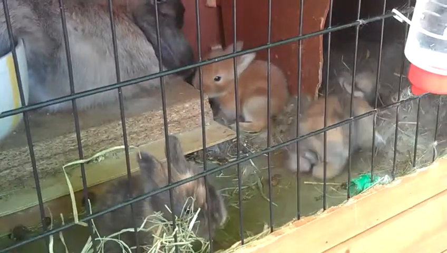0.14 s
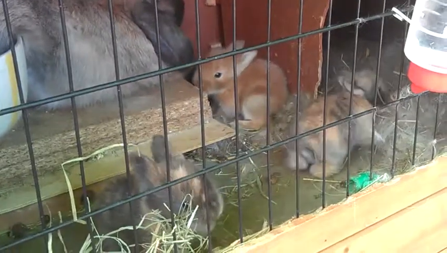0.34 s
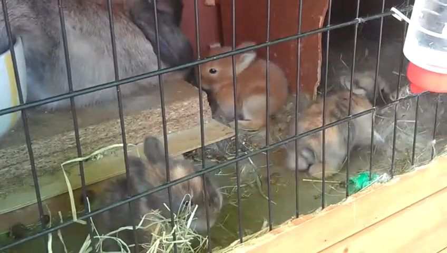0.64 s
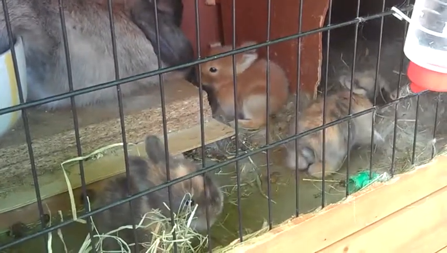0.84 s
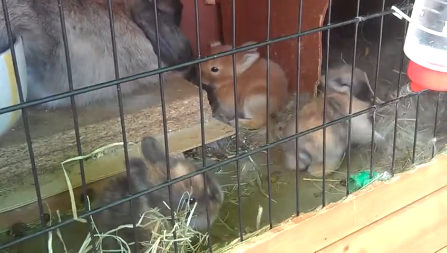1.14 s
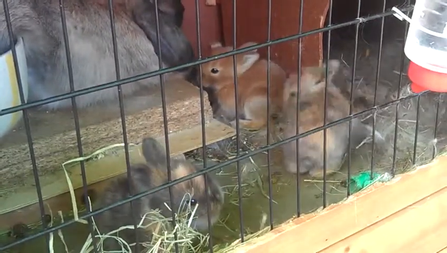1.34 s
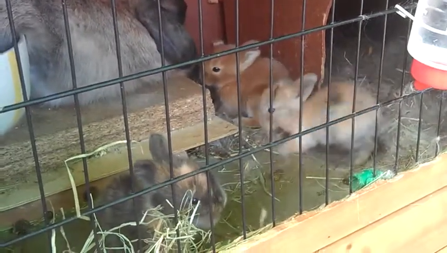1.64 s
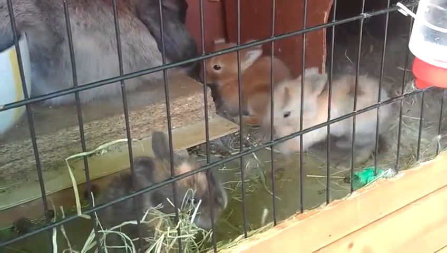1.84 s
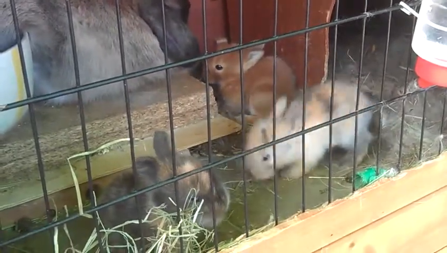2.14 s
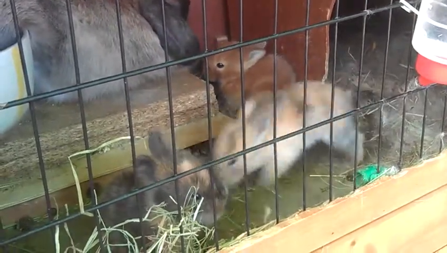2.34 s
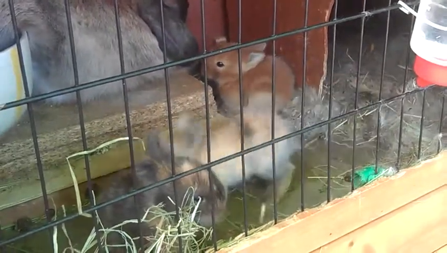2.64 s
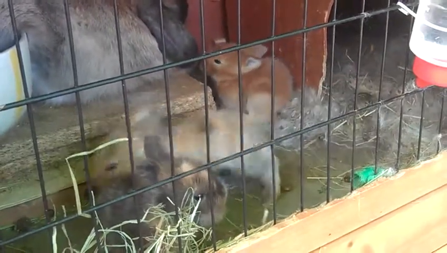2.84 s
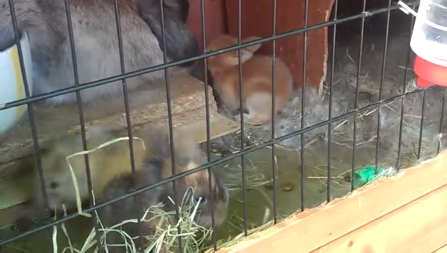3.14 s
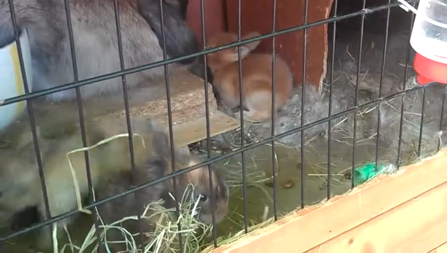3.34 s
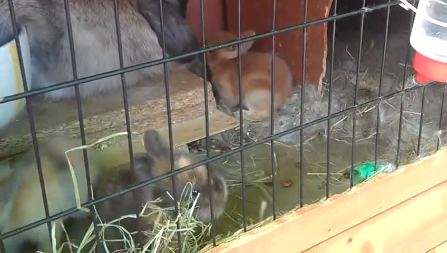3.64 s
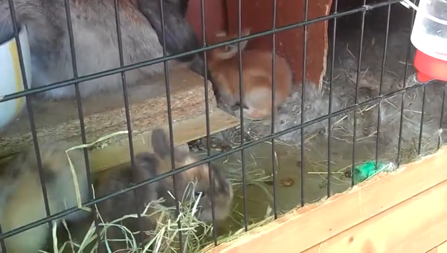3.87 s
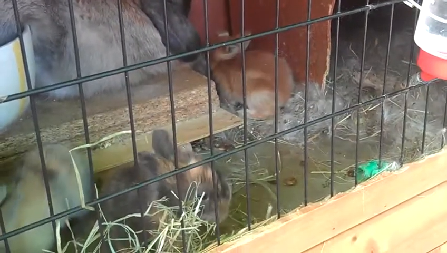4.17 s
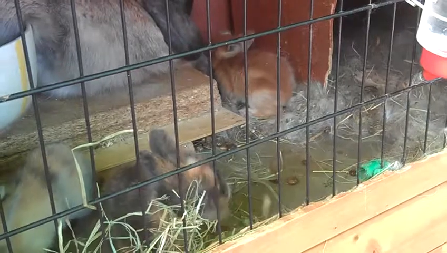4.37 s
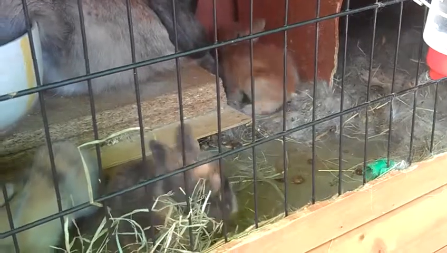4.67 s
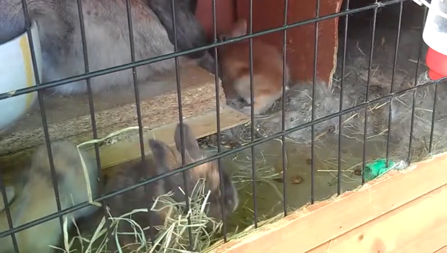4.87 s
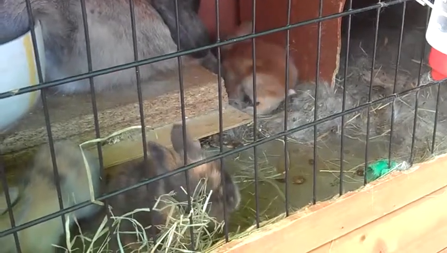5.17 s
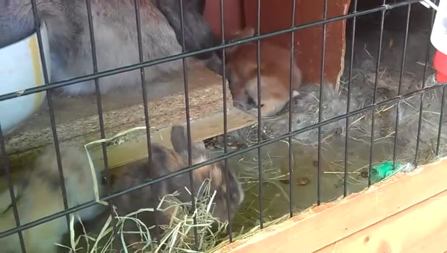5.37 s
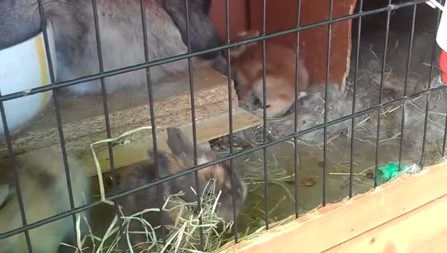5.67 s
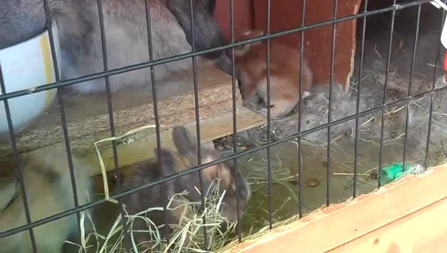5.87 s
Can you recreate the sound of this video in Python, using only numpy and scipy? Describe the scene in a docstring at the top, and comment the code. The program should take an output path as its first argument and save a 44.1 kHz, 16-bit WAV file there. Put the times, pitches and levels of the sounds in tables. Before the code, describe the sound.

A quiet outdoor hutch with steady airy hiss and a far flock of sparrows chirping in bouts. Two tiny low buzzes and a dull bump on the grip come first, then busy hay rustling and sharp stalk snaps, a paw landing on wood, and sparser rustles. Near the end the handled camera body cracks loudly three times, very close, in wide stereo.

```python
"""Young rabbits hop and rummage in dry hay inside a wooden hutch, close to a handheld camera.
Hay, stalks and grit are shaped noise bursts; paws, claws, low buzzes and a bump on the grip are short tones.
The camera shell cracks three times under the fingers: gritty slips set its ringing notes going.
Sparrows, made of falling whistles, chatter far off as echoes over a soft outdoor wash of steady noise.
The recorder widens the stereo picture with a late copy of the left-right difference."""
import sys
import numpy as np
from scipy import signal
from scipy.fft import rfft, irfft, next_fast_len
from scipy.io import wavfile
from scipy.ndimage import uniform_filter1d

SR = 44100
rng = np.random.default_rng(int(sys.argv[2]) if len(sys.argv) > 2 else 0)


def dump(signal):
    """Clip the signal to [-1, 1] and save it as 16-bit WAV at the path in sys.argv[1]."""
    limited = np.clip(np.atleast_2d(signal).T, -1, 1)
    pcm = np.round(limited * 32767).astype(np.int16)
    wavfile.write(sys.argv[1], SR, pcm)


N = 264908  # length of the scene in samples


def amp(db):
    """Turns a level in dB into a gain."""
    return 10 ** (np.asarray(db) / 20)


def evened(x):
    """Scales a sound to an rms of one."""
    return x / np.sqrt(np.mean(x ** 2) + 1e-20)


def read(points, hz, axis=1):
    """Reads one column of a table between its rows, along a log frequency scale."""
    rows = np.transpose(points)
    return np.interp(np.log(hz + 1), np.log(rows[0] + 1), rows[axis])


def shape(x, gain):
    """Filters a sound by a gain given as a function of frequency."""
    size = next_fast_len(N)
    spectrum = rfft(x, size) * gain(np.fft.rfftfreq(size, 1 / SR))
    return irfft(spectrum, size)[..., :N]


def add(mix, s, sound):
    """Mixes a sound in at a time in seconds, cutting off what runs past the end."""
    part = mix[..., round(s * SR):][..., :sound.shape[-1]]
    part += sound[..., :part.shape[-1]]


def high_pass(x, order, hz):
    """Takes away the bass below an edge."""
    return signal.sosfilt(signal.butter(order, hz, "high", fs=SR, output="sos"), x)


def ports(near, other):
    """Makes left and right as sum plus and minus difference; the difference is only partly like the sum."""
    # The two microphone ports. Each row: frequency in Hz, level of the difference against the sum in dB,
    # likeness of sum and difference from -1 to 1.
    port_points = [(60, 1.5, 0.83), (235, -13.5, 0.35), (655, 3, 0.14), (1570, -5.5, 0.3),
                   (3260, -4.5, -0.63), (6700, -3.5, 0.19), (11800, -3, .95), (14000, -1.5, 0.98)]
    same = lambda hz: np.clip(read(port_points, hz, axis=2), -1, 1)
    side = shape(near, lambda hz: amp(read(port_points, hz)) * same(hz))
    side += shape(other, lambda hz: amp(read(port_points, hz)) * np.sqrt(1 - same(hz) ** 2))
    return np.array([near + side, near - side])


def panned(x, pan_db):
    """Makes two channels, left louder than right by pan_db, whose mean keeps the level."""
    left = amp(pan_db)
    return np.outer([left, 1], x) * 2 / (1 + left)


def air():
    """Steady outdoor wash and microphone hiss: shaped noise with a slight slow swell."""
    # Colour of the wash. Each row: frequency in Hz, relative level in dB.
    wash_colour = [(24, -62), (40, -27), (81, -26), (177, -1), (205, 2), (632, -9), (807, -5), (934, -7.5),
                   (1560, -8), (2540, -10.5), (3580, -5), (7090, -19.5), (8830, -19), (11000, -12.5),
                   (13700, -17)]
    wash_db, swell_db = -48.5, .5
    slow = uniform_filter1d(rng.standard_normal(N), size=4000)
    swell = evened(uniform_filter1d(slow, size=4000))
    wash = shape(rng.standard_normal((2, N)), lambda hz: amp(read(wash_colour, hz)))
    near, other = amp(wash_db + swell_db * swell) * evened(wash)
    return ports(near, other)


def chirp(start_hz, end_hz, length):
    """A hoarse falling whistle: a sine whose pitch drops, fast at first, and wobbles at random."""
    t = np.arange(0, length, 1 / SR)
    hz = end_hz + (start_hz - end_hz) * (1 - t / length) ** 1.5
    wobble = evened(uniform_filter1d(rng.standard_normal(len(t)), size=60))
    hz = hz + 190 * wobble  # Hz
    tone = np.sqrt(2) * np.sin(2 * np.pi * np.cumsum(hz) / SR)
    return tone * signal.windows.tukey(len(t), .4)


def yard(x, t60):
    """Far sounds arrive only as two unrelated clouds of echoes, which fall 60 dB in t60 seconds."""
    t = np.arange(SR) / SR
    tails = rng.standard_normal((2, SR)) * amp(-60 * t / t60)
    return signal.fftconvolve(x[None], tails / np.linalg.norm(tails[0]), axes=1)[:, :N]


def sparrows():
    """A dense far flock of short chirps, louder in bouts, with a few falling calls on top."""
    # Bouts of chatter. Each row: loudest moment in seconds, level in dB.
    bouts = [(.0, -48), (0.159, -46), (.56, -51), (.75, -53.5), (1.19, -49.5), (1.69, -45.5), (1.8, -52),
             (2.02, -53.5), (2.33, -44), (2.96, -45), (3.2, -52), (3.709, -48.5), (4.06, -41), (4.78, -43),
             (5.399, -53), (5.52, -48.5), (5.628, -52), (6.0, -45.5)]
    # Falling calls. Each row: start in seconds, level in dB, start pitch in Hz, end pitch in Hz,
    # length in seconds; each bird shifts and delays its call a little.
    falling_calls = [(0.71, -59, 5350, 4690, 0.045), (1.083, -49.5, 6000, 3800, 0.11),
                     (1.897, -55.5, 5600, 4460, 0.087), (2.266, -58, 5200, 3900, 0.061),
                     (2.868, -44, 5590, 4005, 0.07), (4.102, -53, 5100, 4780, 0.044),
                     (4.627, -46, 5810, 3800, .12), (5.381, -52, 4600, 3220, .12),
                     (5.575, -58, 5403, 4376, 0.045)]
    swell_db_per_s, hush_db_per_s, murmur_db = 91.5, 69.5, -62  # fast swell, slower hush, steady murmur
    crest_s = 0.044  # how rounded the top of a bout is
    flock_hz, lead_hz, flock_spread = 3546, 299.5, .2  # the first voices of a bout are higher
    answers, answer_s, answer_spread = 3, .05, .2  # a call is a few birds almost together

    s, db = np.transpose(bouts)[:, :, None]
    t = np.arange(0, N / SR + .01, .005)
    slope = np.where(t < s, -swell_db_per_s, -hush_db_per_s)
    power = amp(db + slope * (np.hypot(t - s, crest_s) - crest_s)) ** 2
    total = power.sum(axis=0) + amp(murmur_db) ** 2
    rising_share = (power * (t < s)).sum(axis=0) / total
    centre_hz = flock_hz + lead_hz * rising_share

    flock, calls = np.zeros(N), np.zeros(N)
    for at, pitch, fall in rng.random((900, 3)) * [N / SR, 1, 1]:
        hz = np.interp(at, t, centre_hz) * (1 + flock_spread * (pitch - .5))
        add(flock, at, chirp(hz * (1 + 0.2522 * fall), hz * (1 - 0.1297 * fall), .03))
    for at, db, start_hz, end_hz, length in falling_calls:
        for late, pitch in rng.random((answers, 2)):
            bird = 1 + answer_spread * (pitch - .5)
            call = chirp(bird * start_hz, bird * end_hz, length)
            add(calls, at + answer_s * late ** 2, amp(db) / np.sqrt(answers) * call)

    level = np.interp(np.arange(N) / SR, t, np.sqrt(total))
    far_flock = evened(yard(flock, t60=0.17)) * level
    return ports(*far_flock + yard(calls, t60=0.49))


def hay():
    """Each rustle is a clump of tiny snaps of uneven size over a duller scuff."""
    # Hay rustles. Each row: time in seconds, crisp level in dB, low scuff against crisp in dB,
    # length in seconds (the loudest point is half a length after the start).
    rustles = [(0.061, -48, -19, 0.0126), (0.573, -45, -16, 0.0037), (1.289, -47, -19.5, 0.011),
               (1.369, -43.5, -12, 0.008), (1.444, -40, 3.5, 0.035), (1.508, -50, -4, 0.052),
               (1.604, -50, -4, 0.064), (1.658, -57, 8, 0.043), (2.091, -48, 2, 0.018),
               (2.136, -64, 20, 0.028), (2.299, -50.5, 6, 0.064), (2.372, -63, 16.5, 0.022),
               (2.419, -53.5, 6, 0.012), (2.445, -48, 2.5, 0.025), (2.509, -39.5, -6.5, 0.038),
               (2.534, -35, -16, 0.039), (2.568, -48.5, 5.5, 0.043), (2.622, -51.5, 4, 0.018),
               (2.698, -49, -18, 0.016), (2.793, -57, -10, 0.021), (2.856, -47.5, 1, 0.065),
               (2.915, -51.5, 5, 0.021), (2.943, -46, -1, 0.013), (3.066, -57, 14.5, 0.025),
               (3.175, -52.5, 4, 0.008), (3.265, -48.5, -13.5, 0.0116), (3.378, -45.5, -14, 0.039),
               (3.549, -48, 2.5, 0.033), (3.687, -51.5, 2, 0.055), (4.115, -50, -5, 0.037),
               (4.614, -57, 2, 0.033), (4.778, -51.5, -6, 0.028), (5.72, -54.5, 2.5, 0.035),
               (5.753, -64.5, 15, 0.068), (5.88, -38, -13, 0.026), (5.913, -58, 6, 0.055),
               (5.96, -51.5, 4.5, 0.066)]
    # Colour of snapping stalks. Each row: frequency in Hz, relative level in dB.
    crisp_colour = [(300, -60), (1500, -12.5), (3500, 5), (6000, -3.5), (8000, -4.5), (11000, 5),
                    (14000, -9)]
    # Colour of paws dragging bedding. Each row: frequency in Hz, relative level in dB.
    scuff_colour = [(100, -60), (300, -21), (800, 2), (1500, 4), (2500, 9.5), (3500, 8.5), (4700, -1),
                    (6500, -17), (9000, -42)]
    crisp, scuff = np.zeros(N), np.zeros(N)
    for s, db, scuff_db, length in rustles:
        u = np.arange(0, 4, 1 / (length * SR)) * 2
        swell = amp(db) * (u * np.exp(1 - u)) ** 2.2
        start = s - .003  # a little before the listed time
        add(crisp, start, swell)
        add(scuff, start, swell * amp(scuff_db))

    # every 30 samples get a size of their own, shared by the two channels of each layer
    sizes = amp(3 * np.minimum(rng.exponential(1, (2, N // 30 + 1)), 3))
    sizes = sizes.repeat(30, axis=1).repeat(2, axis=0)[:, :N]
    snaps = rng.standard_normal((4, N)) * sizes
    bright = evened(shape(snaps[:2], lambda hz: amp(read(crisp_colour, hz))))
    dull = evened(shape(snaps[2:], lambda hz: amp(read(scuff_colour, hz))))
    return ports(*crisp * bright + scuff * dull)


def buzzes():
    """Short low buzzes: four pulses of a tone with three overtones, swelling and fading once."""
    # Each row: start in seconds, level in dB, pulses per second in Hz.
    low_buzzes = [(.067, -37.5, 213), (0.625, -37.5, 214.9)]
    out, t = np.zeros((2, N)), np.arange(2000) / SR
    for s, db, hz in low_buzzes:
        pulses = sum(amp(-4 * k) * np.sin(2 * np.pi * k * hz * t) for k in range(1, 5))
        swell = np.sin(np.pi * np.minimum(t * hz / 4, 1)) ** 0.48
        add(out, s, panned(amp(db) * pulses * swell, 13))
    return out


def grip_bump():
    """A finger bumps the grip: a short tone whose pitch drops as the grip settles."""
    # Each row: start in seconds, level in dB, end pitch in Hz, extra pitch at the start in Hz.
    bumps = [(0.9553, -27, 165, 885)]
    out, t = np.zeros((2, N)), np.arange(2000) / SR
    for s, db, hz, glide_hz in bumps:
        turns = np.cumsum(hz + glide_hz * np.exp(-t / 0.00076)) / SR
        fade = np.exp(-(t / 0.00733) ** 2)
        add(out, s, panned(amp(db) * np.sin(2 * np.pi * turns) * fade, 13))
    return out


def burst(tilt_db, t60, rise_s):
    """A pair of unrelated gritty noise bursts: a sudden start, then a fall of 60 dB in t60 seconds."""
    # Colour of the grit before the tilt. Each row: frequency in Hz, relative level in dB.
    grit_colour = [(300, -62), (700, -12), (2000, 6), (3500, 17.5), (6000, 0), (8000, 1.5), (12000, 1),
                   (14000, -22)]
    t, hz = np.arange(1024) / SR, np.fft.rfftfreq(1024, 1 / SR)
    octaves = np.log2(hz / 3000 + 0.0092)  # the small offset keeps the log finite at 0 Hz
    colour = amp(read(grit_colour, hz) + tilt_db * octaves)
    grit = irfft(rfft(rng.standard_normal((2, 1024))) * colour)
    return evened(grit) * amp(-60 * t / t60) * (1 - np.exp(-t / rise_s))


def stalks():
    """A breaking stalk is one short burst of grit."""
    # Single stalks. Each row: start in seconds, level in dB, brightness in dB per octave.
    breaks = [(1.453, -33, -2), (1.4612, -23, -1), (2.1443, -43.5, -13), (2.2949, -21.5, -3.5),
              (2.3186, -33.5, -6), (2.3354, -33, -5), (2.4205, -40, -8), (2.451, -44, 3), (2.577, -28, 0),
              (2.941, -33, -2), (3.069, -38, -10), (3.175, -38, -2), (3.717, -33, -3), (3.872, -23.5, 3),
              (4.6028, -27.5, -1.5), (5.7444, -36, -11), (5.989, -32, 0)]
    out = np.zeros((2, N))
    for s, db, tilt_db in breaks:
        add(out, s, amp(db) * burst(tilt_db, t60=0.014, rise_s=0.00086))
    return ports(*out)


def claws():
    """A claw scraping a board gives a faint, unsteady, falling note of the board."""
    # Each row: start in seconds, level in dB, start pitch in Hz, end pitch in Hz, length in seconds.
    scrapes = [(2.143, -49.5, 965, 847, 0.03), (4.597, -53.5, 1697, 1486, 0.088),
               (5.741, -56, 1400, 1303, 0.043), (5.947, -50, 1660, 1530, 0.066)]
    out = np.zeros((2, N))
    for s, db, *note in scrapes:
        add(out, s, amp(db) * np.array([chirp(*note), chirp(*note)]))
    return ports(*out)


def paws():
    """A paw landing on the floor boards: a low board tone and a little noise that swell and die quickly."""
    # Each row: start in seconds, level in dB, pitch of the board in Hz.
    landings = [(2.7, -59, 240), (3.068, -35.5, 320), (3.086, -33.5, 272), (3.106, -42, 273),
                (3.128, -46, 260)]
    out, t = np.zeros((2, N)), np.arange(2000) / SR
    for s, db, hz in landings:
        noise = np.diff(uniform_filter1d(rng.standard_normal(len(t) + 1), size=40))
        knock = np.sin(2 * np.pi * hz * t) + 0.12 * evened(noise)
        swell = t / 0.0035 * np.exp(1 - t / 0.0034)
        add(out, s, panned(amp(db) * knock * swell, 4.8))
    return out


def shell():
    """Each slip of the camera shell rings the same notes under a burst of grit; soft cracks lose their top."""
    # Cracks. Each row: start in seconds, level in dB, number of slips, low knock in dB,
    # brightness of the first slip in dB per octave, treble edge in Hz, left against right in dB.
    cracks = [(4.9668, -5, 1, -7.5, -4, 9250, -2), (5.445, 2, 4, 4.5, 8.5, 13700, -5),
              (5.8745, -7, 1, 1.5, 10.5, 13100, -6)]
    # Notes the shell rings with. Each row: pitch in Hz, time to the peak in seconds, relative level in dB,
    # left against right in dB, added to that of the crack.
    ringing_notes = [(427, 0.0014, -25.5, -3), (960, 0.0008, -15.5, -2), (1530, 0.00051, -28, 11),
                     (2155, 0.00056, -14.5, 6), (3020, 0.00087, -21, -15), (3365, 0.00033, 0, -12.5),
                     (5080, 0.00028, -12, -7), (7670, 0.00022, -8, -8.5), (8760, 0.00089, -24.5, -21),
                     (10180, 0.00021, -14.5, -5), (12370, 0.00021, -20.5, 29)]
    slip_gap_s, slip_slowing, slip_fade_db = .0006, .1, -2.5  # each further slip has a longer gap and is weaker
    slip_dulling_db, grit_db = -2.5, -10  # brightness change per further slip in dB per octave; level of grit
    out, t = np.zeros((2, N)), np.arange(1024) / SR
    for s, db, slips, knock_db, bright_db, top_hz, pan_db in cracks:
        soft = signal.butter(4, min(top_hz, 20000), fs=SR, output="sos")
        for k in range(round(slips)):
            tilt_db = bright_db + k * slip_dulling_db
            grit = burst(tilt_db / 2, t60=0.017, rise_s=0.00018)
            slip = amp(grit_db) * grit * panned([1], pan_db)
            for hz, peak_s, mode_db, side_db in ringing_notes:
                bright_part_db = tilt_db * max(np.log2(hz / 3400), 0)
                level = amp(mode_db + bright_part_db + knock_db * (hz < 2500))
                swell = t / peak_s * np.exp(1 - t / peak_s)
                ring = level * swell * np.sin(2 * np.pi * hz * t)
                slip = slip + panned(ring, pan_db + side_db)
            at = s + k * slip_gap_s * (1 + k * slip_slowing)
            add(out, at, amp(db + k * slip_fade_db) * signal.sosfilt(soft, slip))
    return out


def scene():
    """All sources at the two ports; small things close by radiate no deep bass."""
    near = hay() + stalks() + claws() + shell()
    thuds = buzzes() + grip_bump() + paws()
    return air() + sparrows() + high_pass(near, 3, hz=148) + high_pass(thuds, 3, hz=45)


def record(dry):
    """Widens with a late difference of opposite sign on each side; clips, cuts deep bass and top treble."""
    widen_s, widen_db, edge_hz = .01, -2.0, 14050
    difference = high_pass((dry[0] - dry[1]) / 2, 2, hz=190)
    # half a sample more delay, with the treble lifted again
    late = signal.lfilter([.5, .5], 1, difference) + 0.34 * np.gradient(np.gradient(-difference))
    late = amp(widen_db) * np.r_[np.zeros(round(widen_s * SR)), late][:N]
    wide = np.clip(dry + np.outer([1, -1], late), -1, 1)
    wide = np.clip(high_pass(wide, 2, hz=45), -1, 1)
    band_limit = signal.firwin(511, edge_hz, window=("kaiser", 9), fs=SR)
    return signal.oaconvolve(wide, band_limit[None], "same")


dry = scene()
out = record(dry)
dump(out)
```